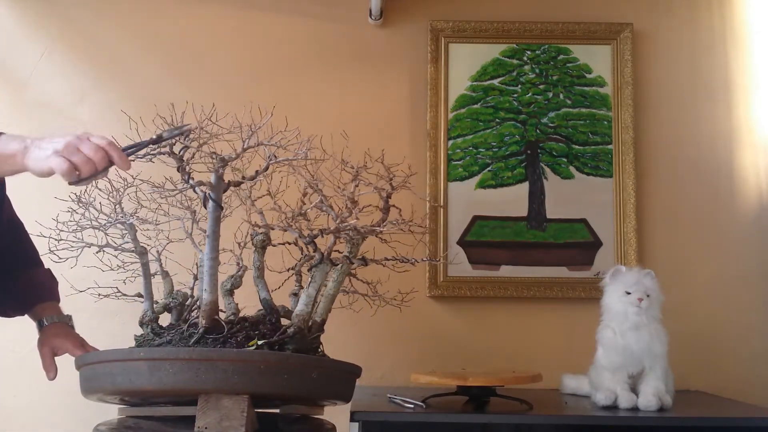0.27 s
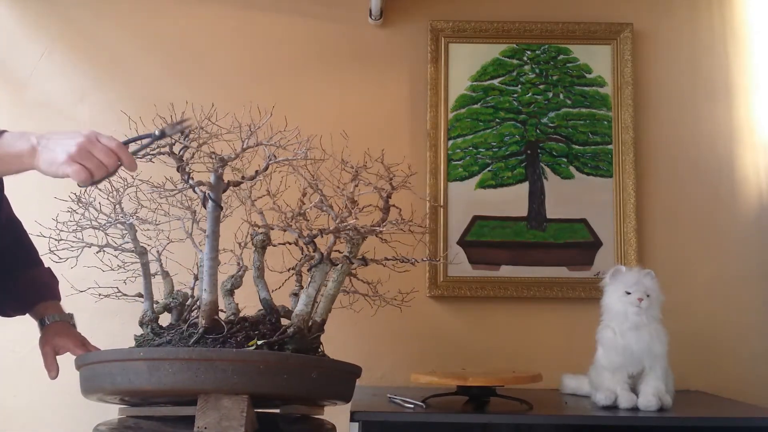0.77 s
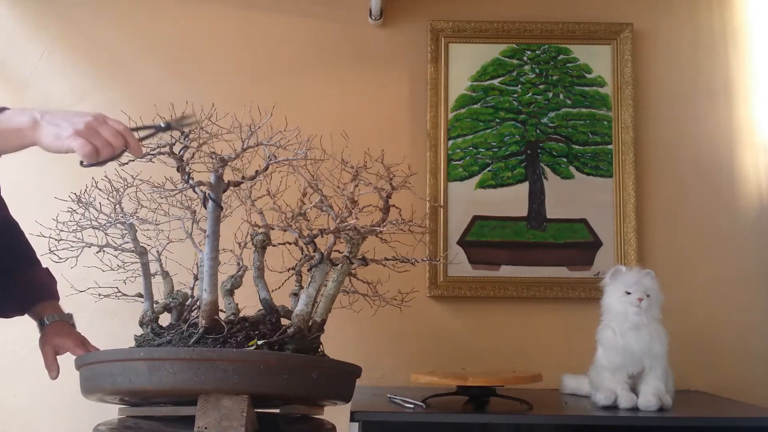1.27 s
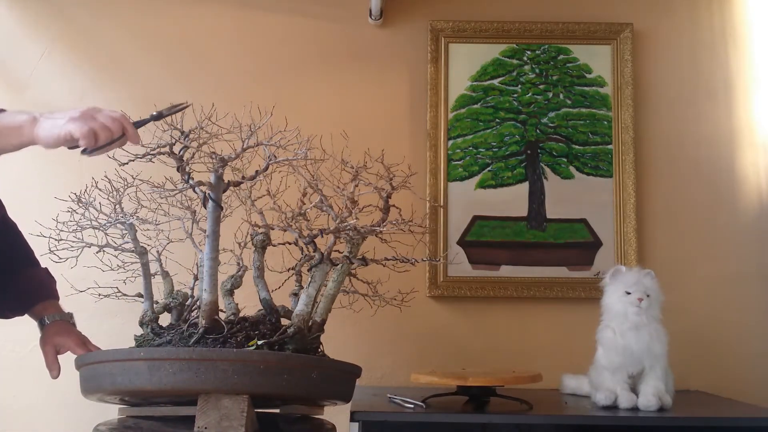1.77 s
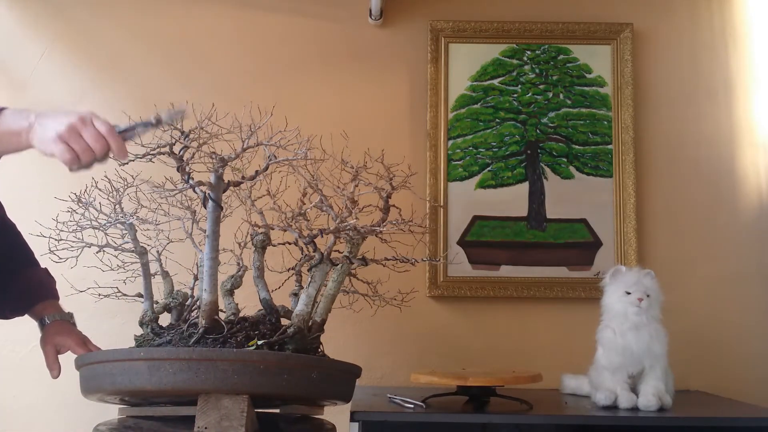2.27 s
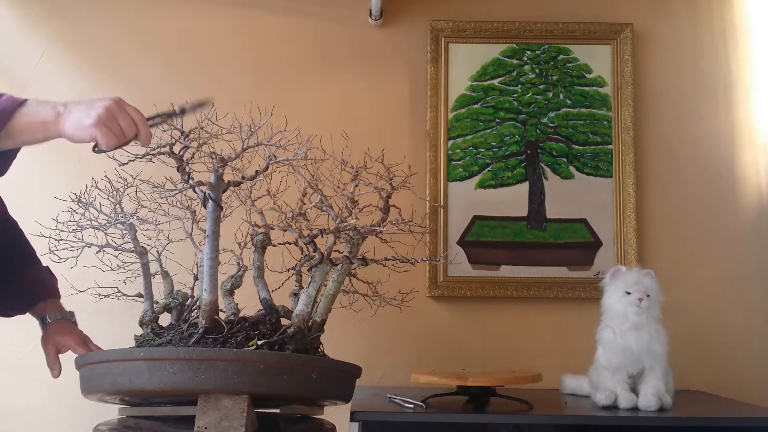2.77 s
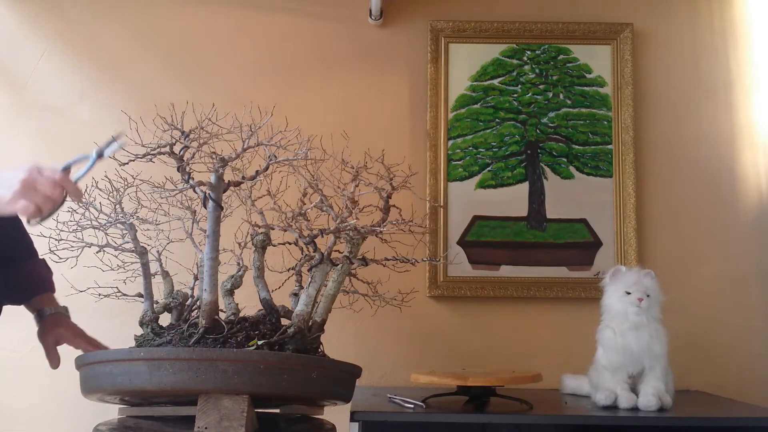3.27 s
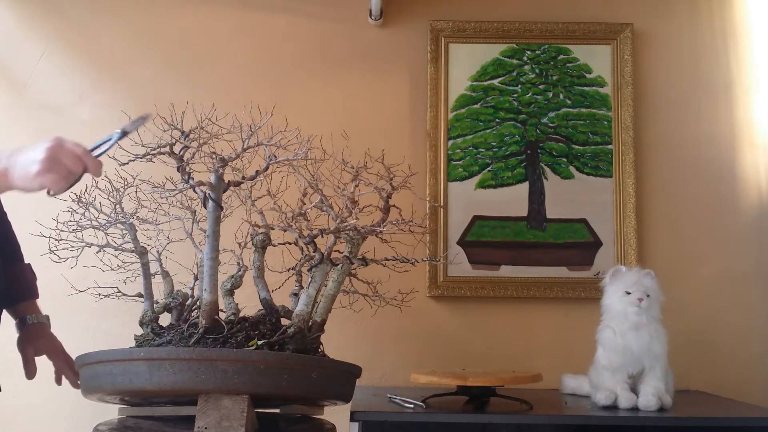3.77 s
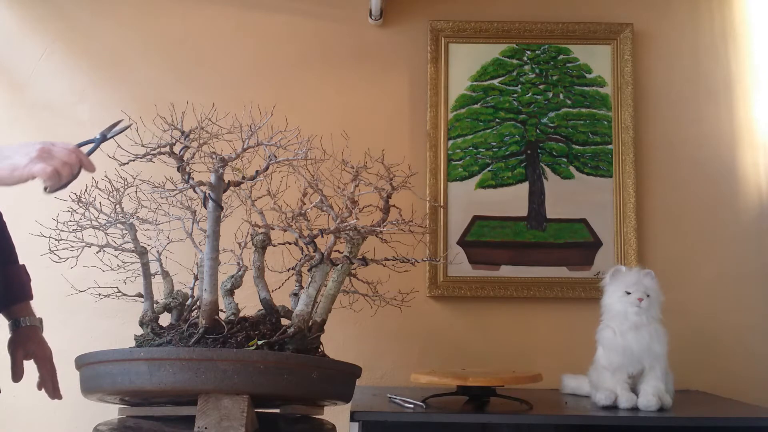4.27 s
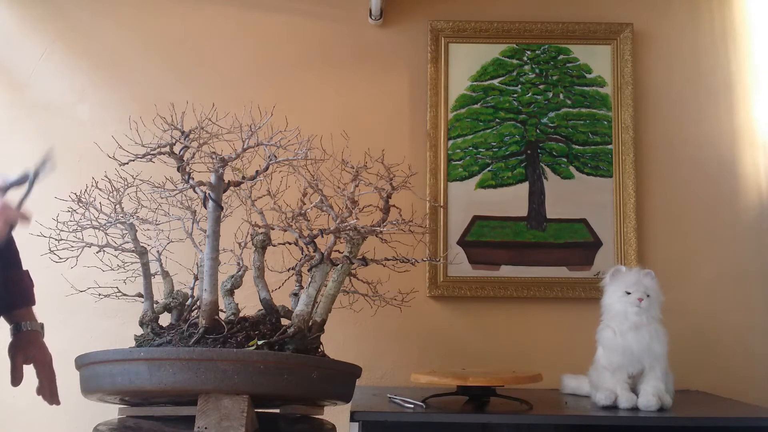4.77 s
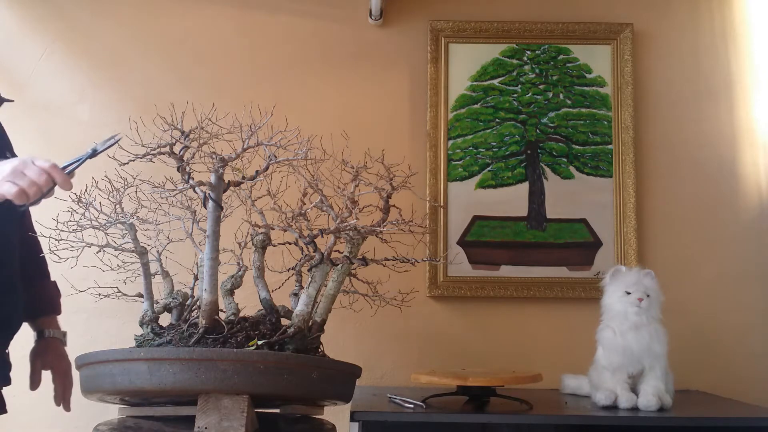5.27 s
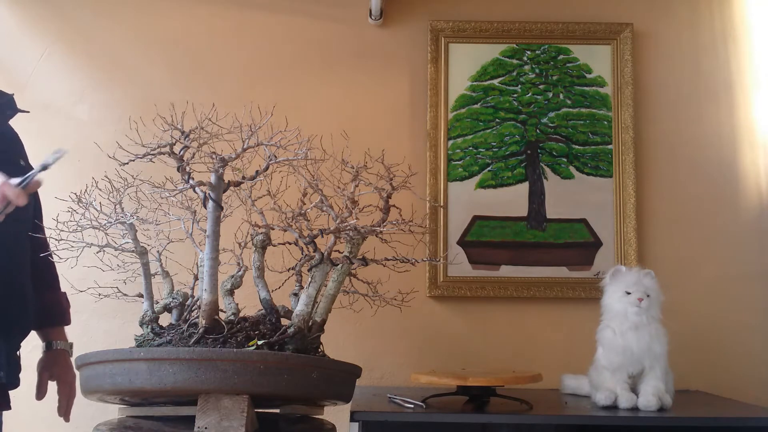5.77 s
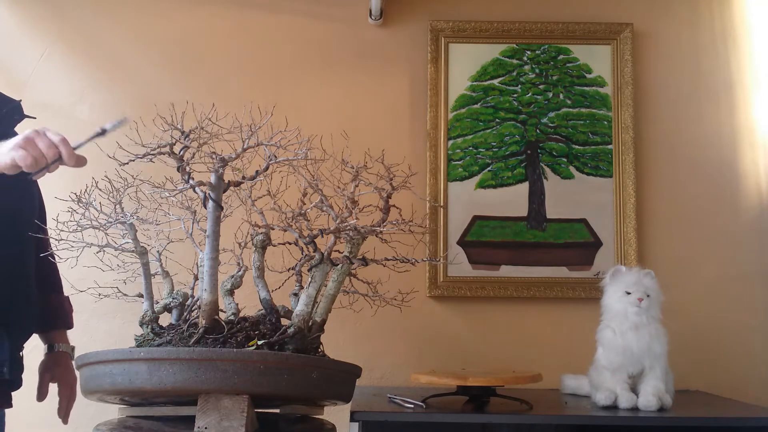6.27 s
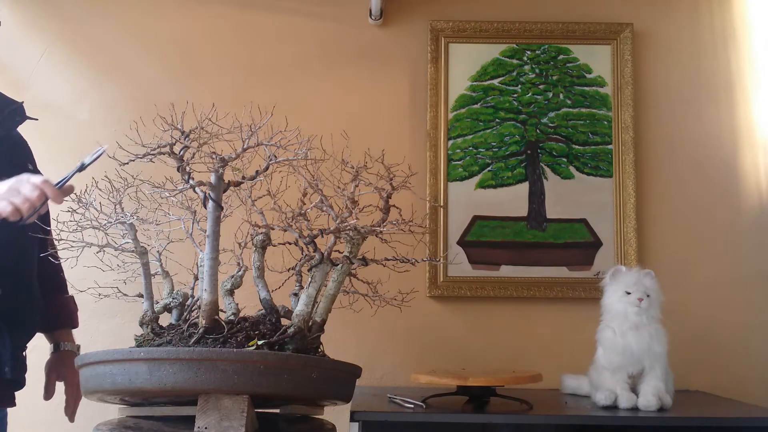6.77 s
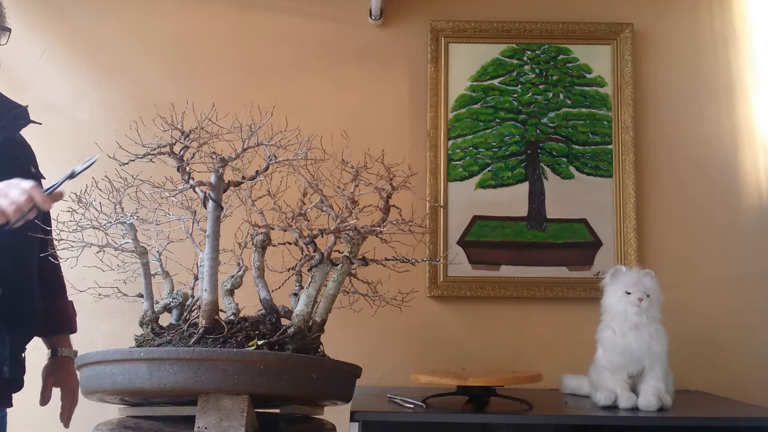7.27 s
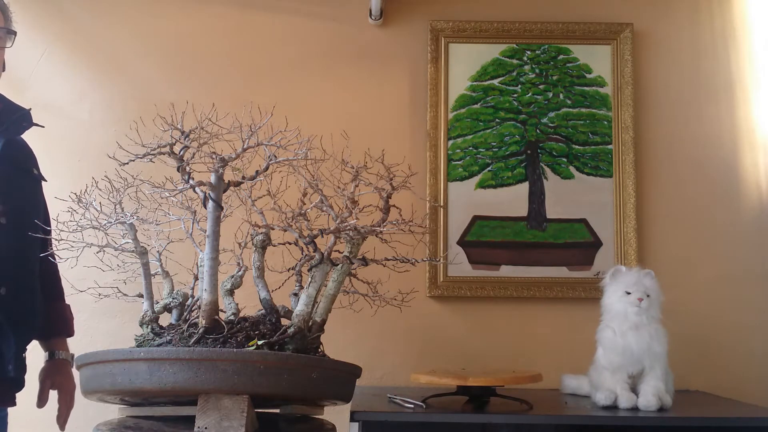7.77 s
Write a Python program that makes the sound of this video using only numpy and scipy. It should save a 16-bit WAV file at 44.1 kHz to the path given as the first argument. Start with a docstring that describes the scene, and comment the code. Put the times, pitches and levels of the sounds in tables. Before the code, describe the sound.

Steel shears trim dry twigs in a hard, short-echoing room, close and a little left, over constant soft microphone hiss and a faint low throb. A moderate snip opens at once, then a strong one at 0.5 s, a tiny tick at 1.0, a medium cut at 1.5, and strong cracks at 2.0 and 2.7. Meanwhile an engine outside hums low, rising unsteadily until about 2.9, then sagging and vanishing by 3.7. Lighter cuts fall at 3.7 and 4.5, with dull bumps around 3.1, 3.8 and 4.5; small ticks at 5.0 precede a loud snip at 5.3. From about 4 s another vehicle approaches, its deep wavering drone and roar swelling from 5.4 and booming fullest after 7. Medium snips come at 6.3 and 6.8, a very sharp one at 7.4. Soft thumps at 7.3 and 7.9 surround a faint rising squeak near 7.7 and a final ringing cut at 7.9.

```python
"""An engine drones past outside while small steel shears snip dry twigs in a hard-walled room, a little to the left.
Each cut is a splintery noise burst coloured by ringing steel, thrown back by near surfaces and a decaying noise tail.
The engine, then a nearing vehicle that booms in the room, are unsteady tones over rumble, roar and treble noise.
Soft bumps are swells of low noise, a thin squeak is two jittery tones, and the microphones hiss throughout."""
import sys
import numpy as np
from scipy import signal
from scipy.fft import rfft, irfft, next_fast_len
from scipy.io import wavfile
from scipy.ndimage import uniform_filter1d, map_coordinates

SR = 44100
rng = np.random.default_rng(int(sys.argv[2]) if len(sys.argv) > 2 else 0)


def digitize_waveform(pressure):
    """Quantize a signal to 16-bit integers and store it at the path in sys.argv[1].

    Rows of a 2-D input are taken as channels; values are limited to [-1, 1].
    """
    field = np.atleast_2d(pressure).T
    bounded = np.clip(field, -1, 1)
    quanta = np.round(bounded * 32767).astype(np.int16)
    wavfile.write(sys.argv[1], SR, quanta)


def magnitude_from_level(level_db):
    """Linear magnitude for a level in decibels (20 dB per decade)."""
    exponent = np.asarray(level_db, float) / 20
    return 10 ** exponent


N = 353990  # length in samples

# Passing engine, revving up and then let go.
# Each row: time in seconds, firing rate in Hz, level in dB before the multiples and resonances.
PASSING_ENGINE = [(0.0, 79.3, -68.5), (0.3, 84, -73.5), (0.6, 87.04, -67.5), (0.9, 88.68, -70.5),
                  (1.25, 91.1, -70.5), (1.6, 95.5, -62.5), (1.76, 96, -71.5), (2.12, 96.6, -63.5),
                  (2.47, 97, -67.5), (2.88, 100, -65), (3.15, 93.6, -63), (3.32, 90.3, -73),
                  (3.45, 84, -76), (3.7, 82.2, -103)]
# Notes of the passing engine. Each row: multiple of the firing rate, gain in dB, phase roughness in radians.
FIRING_MULTIPLES = [(1, -0.5, 0.093), (2, -7, 0.16), (5, -12.5, 0.5)]
# Resonances its notes climb through. Each row: centre in Hz, width in Hz, peak gain in dB.
PIPE_RESONANCES = [(97, 15.3, 14.5), (177.4, 12.2, 16.5), (442.7, 26, 9.5)]
# Nearing vehicle. Each row: time in seconds, low note in Hz, level in dB relative to its closest.
NEARING_VEHICLE = [(3.9, 55.5, -43), (4.4, 57.6, -28), (5.15, 57, -29.5), (5.38, 56.2, -15),
                   (5.55, 56.5, -18.5), (5.95, 56.7, -17), (6.8, 56.2, -11), (7.06, 54.5, -4.5),
                   (7.29, 54.5, -3.5), (7.42, 54.6, 0.0), (7.58, 54.8, -0.5), (8.03, 55, -1)]

# What the two vehicles drive, one layer a table. Each holds: still level in dB, gain in dB over the engine,
# level in dB with the nearing vehicle at its closest, dB gained per dB of nearing.
RUMBLE_DRIVE = (-67, 5.5, -43.5, 1)
ROAR_DRIVE = (-69, 1, -43.5, 1.07)
TREBLE_DRIVE = (-67.5, 2, -56.5, 0.6)
DRONE_DRIVE = (-71, -0.5, -49.5, 0.7)

# Noise colours. Each row: frequency in Hz, relative level in dB per Hz.
RUMBLE_COLOUR = [(14, -30), (27, -4), (40, -24), (60, -5.5), (120, -6), (250, -3.5), (400, -12.5),
                 (520, -8.5), (880, -120)]
ROAR_COLOUR = [(150, -37), (250, -4), (398, -4), (447, -5), (702, -3.5), (875, -4), (1180, -8.5),
               (1380, -10.5), (4000, -27.5), (5200, -29), (8800, -120)]
HISS_COLOUR = [(710, -5), (1200, -12), (2030, -9.5), (2760, -11.5), (3360, -12), (3970, -12.5), (4730, -12),
               (5450, -13.5), (6500, -5.5), (6940, -10.5), (7570, -8), (12700, -18.5), (14900, -17),
               (16000, -28), (16500, -63)]
THUD_COLOUR = [(36, -38), (55, -5.5), (180, 0), (450, -8), (1200, -12), (2500, -45)]
THROB_COLOUR = [(8, -120), (16, -2), (27, -12), (36, -36), (60, -120)]

# Stereo likeness of the noises. Each row: frequency in Hz, left-right correlation from -1 to 1.
STEREO_LIKENESS = [(25, 0.65), (60, 0.9), (150, 0.92), (380, 0.79), (600, 0.44), (950, -0.12),
                   (2400, -0.028), (15000, -0.02)]
# Standing waves of the room. Each row: centre in Hz, width in Hz, peak gain in dB.
STANDING_WAVES = [(53.7, 13, 9.5), (70, 22, 6), (96.6, 6.2, 14), (131.8, 11.8, 13), (171, 6, 10),
                  (206, 25, 4), (248, 17, 2), (326, 25, 6.5), (409, 9, 12.5)]

# Cuts and small blade ticks. Each row: time in seconds, just before the crack,
# crack level in dB before the direct and room gains, brightness in dB per octave, ring in Hz, ring gain in dB.
CUTS = [(0.0326, -17.5, -0.9, 5270, 3.5), (0.5136, -9, 0, 6070, 8), (1.0253, -37.5, -5, 5000, 2),
        (1.4866, -17.5, 0.5, 4900, 5), (2.0117, -6, 0.2, 4750, 4), (2.6367, -46, -2, 2977, 3),
        (2.717, -7, 1, 5150, 3), (3.6665, -18, 0, 4380, 1.5), (4.479, -20, -0.5, 2250, 4.5),
        (5.015, -42, -12, 1000, 5), (5.033, -41, -7.5, 640, 26), (5.3044, -42, -5, 4340, 3),
        (5.3333, -5.5, 0.5, 5790, 0.5), (5.792, -48, -2, 2620, 3), (6.2547, -16, -1, 4570, 0),
        (6.8429, -19, -1.5, 5840, 4), (7.4031, -4.5, 0.2, 4650, 2.5), (7.8663, -20, -1, 5450, 12)]
# Colour of a cut as the microphones hear it. Each row: frequency in Hz, relative level in dB per Hz.
CUT_COLOUR = [(530, -34.5), (900, -27), (1400, -18), (2400, -14.5), (3200, -13), (4400, -6), (5400, -6),
              (7000, -2.5), (8200, -5), (8750, -5.5), (10800, -3), (12300, 0), (14500, -2), (15450, -2),
              (15750, -13), (16700, -45)]
# Near surfaces. Each row: mean delay in ms, left and right gain in dB before the stereo lean.
NEAR_ECHOES = [(2.1, -12, -5), (3.1, -4, -9), (7.6, -8, -7), (9, -8, -9)]
# Room decay. Each row: frequency in Hz, time to fall 60 dB in seconds.
ROOM_DECAY = [(800, 0.39), (2500, 0.29), (7000, 0.25), (15000, 0.2)]
# Stereo lean of the cuts. Each row: frequency in Hz, left minus right in dB.
STEREO_LEAN = [(60, -6), (180, 5), (550, -2), (1650, -3), (4970, -1), (15000, 1)]
# Resonances of the blades. Each row: centre in Hz, width in Hz, mean peak gain in dB.
BLADE_RESONANCES = [(2070, 250, 4), (2830, 400, 3.5), (3350, 810, 4.5), (4760, 110, 1), (6320, 240, 4),
                    (6950, 500, 5), (8000, 470, 5), (11100, 630, 0), (14600, 790, 4.5)]

# Soft low swells. Each row: peak time in seconds, peak level in dB, half-length in seconds.
SOFT_THUDS = [(3.128, -55, 0.053), (3.785, -54, 0.081), (4.513, -59.5, 0.059), (4.747, -64, 0.033),
              (7.303, -43.5, 0.15), (7.878, -47, 0.13)]
# A thin squeak. Each row: time in seconds, mean pitch in Hz, mean level of the upper strand in dB.
SQUEAK_PATH = [(7.62, 4850, -80), (7.655, 4930, -66), (7.72, 5000, -69), (7.79, 5120, -70),
               (7.83, 5200, -80)]

FLUTTER_DB = 4  # how deeply the nearing notes waver
UPPER_HZ, UPPER_DB, UPPER_GROWS, UPPER_ENDS_S = 114, -54, 0.56, 7.32  # higher note of the nearing vehicle
THROB_DB = -69  # steady throb of the building, before the lean to the right
DIRECT_LEFT_DB, DIRECT_RIGHT_DB, ROOM_DB = 6.5, 4, 12.5  # gains over the crack, before the stereo lean
RIGHT_LAG_MS = .17  # the direct sound reaches the right microphone later
CRACK_DELAY_MS = .75  # the crack comes this long after the listed time


def unit(x):
    """Scaled to rms 1."""
    return x / np.sqrt(np.mean(x ** 2) + 1e-20)


def along(points, hz):
    """Reads (Hz, value) points on a log frequency axis."""
    f, v = np.transpose(points)
    return np.interp(np.log(hz + 1), np.log(f + 1), v)


def curves(rows):
    """One value per sample for each column after the time."""
    s, *cols = np.transpose(rows)
    return [np.interp(np.arange(N) / SR, s, c) for c in cols]


def during(rows, fade):
    """1 while a table lasts, fading in and out at its ends over fade seconds."""
    t = np.arange(N) / SR
    return np.clip(np.minimum(t - rows[0][0], rows[-1][0] - t) / fade, 0, 1)


def wobble(rate):
    """A smooth random curve through rate knots a second."""
    knots = rng.standard_normal(int(N * rate / SR) + 4)
    return map_coordinates(knots, [np.arange(N) * rate / SR])


def lift(hz, peaks):
    """Summed gain in dB of (Hz, width Hz, dB) resonances."""
    return sum(db / (1 + (2 * (hz - centre_hz) / width_hz) ** 2) for centre_hz, width_hz, db in peaks)


def boomy(spectrum):
    """A spectrum lifted at each standing wave of the room."""
    hz = np.geomspace(spectrum[0][0], spectrum[-1][0], num=400)
    return np.c_[hz, along(spectrum, hz) + lift(hz, STANDING_WAVES)]


def causal(db):
    """Minimum-phase response with these levels on an FFT grid: it starts at once."""
    cepstrum = irfft(np.log(np.maximum(magnitude_from_level(db), 1e-6)))
    cepstrum[1:len(cepstrum) // 2] *= 2
    cepstrum[len(cepstrum) // 2 + 1:] = 0
    return np.exp(rfft(cepstrum))


def driven(still_db, over_engine_db, closest_db, grows):
    """Level in dB of a layer: its still floor plus the power from both vehicles."""
    engine_db = curves(PASSING_ENGINE)[1] + over_engine_db
    nearing_db = closest_db + grows * curves(NEARING_VEHICLE)[1]
    return 10 * np.log10(sum(magnitude_from_level(db) ** 2 for db in [still_db, engine_db, nearing_db]))


def note(hz, db, rough):
    """A tone on a pitch curve, its phase and size a little unsteady."""
    phase = 2 * np.pi * np.cumsum(hz) / SR + rough * wobble(8.8)
    return np.sqrt(2) * magnitude_from_level(db + 0.9 * wobble(6.8)) * np.sin(phase)


def rush(spectrum, patchy_db):
    """Coloured stereo noise of rms 1 whose gain varies in random patches of time and frequency."""
    _, _, z = signal.stft(rng.standard_normal((2, N)), SR, nperseg=2048)
    field = uniform_filter1d(rng.standard_normal(z.shape[1:]), size=12, axis=0)
    patches = unit(uniform_filter1d(field, size=4, axis=1))
    noise = signal.istft(z * magnitude_from_level(patchy_db * patches), SR, nperseg=2048)[1]
    size = next_fast_len(N + SR)
    hz = np.fft.rfftfreq(size, 1 / SR)
    coloured = rfft(noise, size) * magnitude_from_level(along(spectrum, hz))
    # the share of mid and side sets the left-right correlation
    turn = np.arccos(np.clip(along(STEREO_LIKENESS, hz), -1, 1)) / 2
    mid, side = irfft(coloured * [np.cos(turn), np.sin(turn)], size)[:, :N]
    return unit(np.array([mid + side, mid - side]))


def engines():
    """Firing notes reach the room as a few low lines; the passing ones swell where they meet a resonance."""
    hz, db = curves(PASSING_ENGINE)
    passing = 0
    for k, k_db, rough in FIRING_MULTIPLES:
        passing = passing + note(k * hz, db + k_db + lift(k * hz, PIPE_RESONANCES), rough)
    hz, db = curves(NEARING_VEHICLE)
    drone = note(hz, driven(*DRONE_DRIVE) + FLUTTER_DB * wobble(8), rough=.4)
    upper_db = UPPER_DB + UPPER_GROWS * db + FLUTTER_DB * wobble(12)
    upper = note(UPPER_HZ + 0 * hz, upper_db, rough=.8)
    return passing + drone + during([[0], [UPPER_ENDS_S]], fade=.1) * upper


def road():
    """Noise of rumble, tyre roar and a treble rush that sinks into the microphones' hiss, over a steady throb."""
    swell = wobble(3.69)  # shared by rumble and roar
    rumble = magnitude_from_level(driven(*RUMBLE_DRIVE) + 1.5 * swell) * rush(boomy(RUMBLE_COLOUR), patchy_db=3.0)
    roar = magnitude_from_level(driven(*ROAR_DRIVE) + 0.6 * swell) * rush(ROAR_COLOUR, patchy_db=1.5)
    throb = magnitude_from_level(THROB_DB) * rush(THROB_COLOUR, patchy_db=0.5)
    treble = magnitude_from_level(driven(*TREBLE_DRIVE)) * rush(HISS_COLOUR, patchy_db=0.66)
    lean_right = magnitude_from_level([[-.8], [.8]])
    return lean_right * (rumble + roar + throb) + treble


def burst(ms, length_ms):
    """Random splinters of energy 1 from time zero, dying by a factor e every length_ms."""
    grains = rng.standard_normal(ms.shape) * magnitude_from_level(1 * rng.standard_normal(ms.shape))
    grains = (ms >= 0) * np.exp(-np.abs(ms) / length_ms) * grains
    return grains / np.linalg.norm(grains, axis=-1, keepdims=True)


def room(size):
    """A fresh stereo tail, left energy 1: grainy at first, then each frequency dies at its own speed."""
    hz, t, z = signal.stft(rng.standard_normal((2, size)), SR, nperseg=128)
    decay = magnitude_from_level(-60 * t / along(ROOM_DECAY, hz)[:, None])
    tail = signal.istft(z * decay, SR, nperseg=128)[1][:, :size]
    t = np.arange(size) / SR
    grain = np.repeat(rng.standard_normal((2, size // 16)), 16, axis=1)
    build_up = 1 - np.exp(-t / 0.0026)
    tail = tail * build_up * magnitude_from_level(4.3 * np.exp(-t / 0.019) * grain)
    return tail / np.linalg.norm(tail[0])


def shears(size=2 ** 15, lead=512):
    """The blades scrape, the twig cracks and rings; direct sound, scattered echoes and tail share one colour."""
    out, hz = np.zeros((2, N + size)), np.fft.rfftfreq(size, 1 / SR)
    ms = (np.arange(3 * lead) - lead) * 1000 / SR  # time from the crack
    lag = np.exp(-2j * np.pi * hz * RIGHT_LAG_MS / 1000)
    direct = np.array([magnitude_from_level(DIRECT_LEFT_DB) + 0 * lag, magnitude_from_level(DIRECT_RIGHT_DB) * lag])
    for s, db, bright_db, ring_hz, ring_db in CUTS:
        # an added click makes the first break the sharpest
        crack = rfft(burst(ms, length_ms=.3) + (ms == 0), size)
        crack /= np.sqrt(uniform_filter1d(np.abs(crack) ** 2, size=size // 40))  # broad and even
        scrape = (ms < 0) * magnitude_from_level(-33) * np.exp(-np.abs(ms) / 1.2) * rng.standard_normal(ms.shape)
        heard = (crack + rfft(scrape, size)) * direct
        for delay_ms, *both_db in NEAR_ECHOES:
            # the hand moves, so the echoes shift from cut to cut
            since = ms - delay_ms * (1 + 0.05 * rng.standard_normal((2, 1)))
            heard += magnitude_from_level(np.c_[both_db]) * rfft(burst(since, length_ms=0.46), size)
        tail = np.pad(room(size // 2), ((0, 0), (lead, 0)))
        heard += magnitude_from_level(ROOM_DB) * rfft(tail, size)
        # each cut rings the blades differently
        struck = [(f, w, g + rng.normal(0, 2.5)) for f, w, g in BLADE_RESONANCES]
        rings_db = lift(hz, struck + [(ring_hz, 700, ring_db)])
        tilt_db = bright_db * np.log2((hz + 500) / 7000)
        colour = causal(along(CUT_COLOUR, hz) + tilt_db + rings_db)
        heard *= magnitude_from_level(along(STEREO_LEAN, hz) * [[.5], [-.5]])
        cut = irfft(heard * colour / np.sqrt(np.mean(np.abs(colour) ** 2)))
        start = round((s + CRACK_DELAY_MS / 1000) * SR) - lead
        out[:, start:][:, :size] += magnitude_from_level(db) * cut
    return out[:, :N]


def thuds():
    """Dull bumps: low noise under bell-shaped swells, coloured by the room's standing waves."""
    t = np.arange(N) / SR
    swells = sum(magnitude_from_level(db) * np.exp(-((t - s) / half) ** 2) for s, db, half in SOFT_THUDS)
    return swells * rush(boomy(THUD_COLOUR), patchy_db=0.5)


def squeak():
    """A faint rising squeak, made breathy by fast pitch and level jitter, with a weaker strand under it."""
    hz, db = curves(SQUEAK_PATH)
    upper = note(hz + 45 * wobble(250), db + 1.5 * wobble(80), rough=.3)
    lower = note(.88 * hz + 70 * wobble(250), db - 4 + 3 * wobble(80), rough=.3)
    return during(SQUEAK_PATH, fade=0.0084) * (upper + lower)


def scene():
    """Engines, road, shears, thuds and squeak, summed in stereo."""
    return engines() + road() + shears() + thuds() + squeak()


def roll_off(x):
    """The treble ends steeply here."""
    return signal.sosfilt(signal.butter(12, 16820, fs=SR, output="sos"), x)


def record(dry):
    """Turns the finished mix into the sound that is written out."""
    return roll_off(dry)


dry = scene()
out = record(dry)
digitize_waveform(out)
```